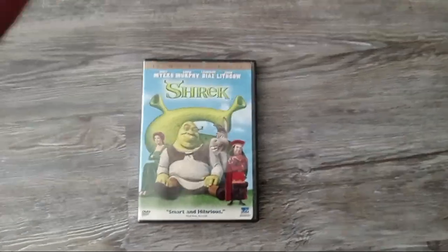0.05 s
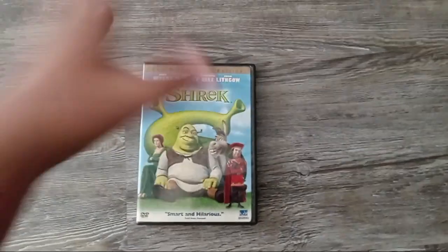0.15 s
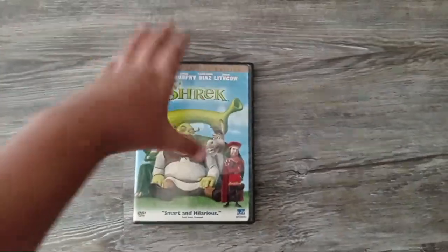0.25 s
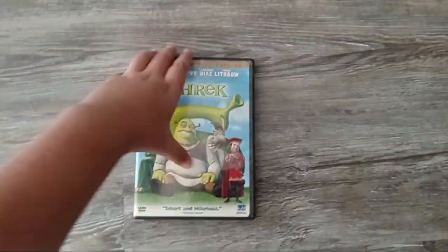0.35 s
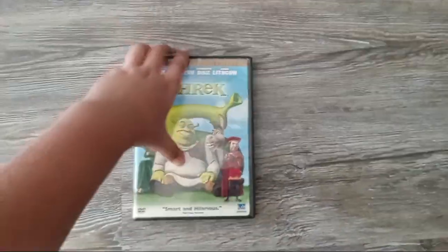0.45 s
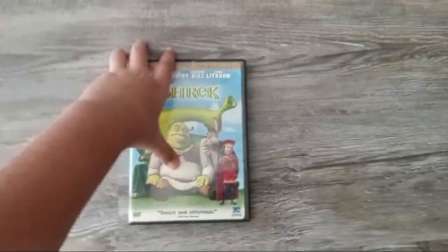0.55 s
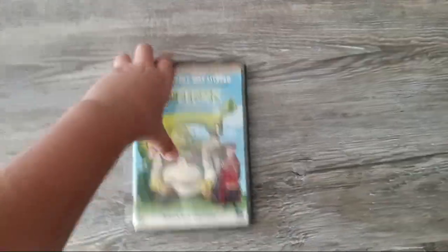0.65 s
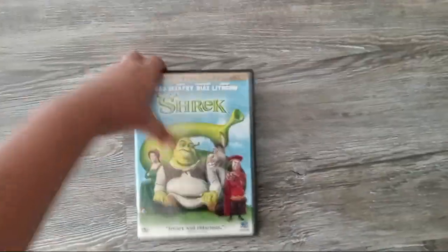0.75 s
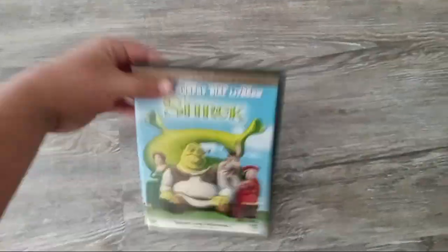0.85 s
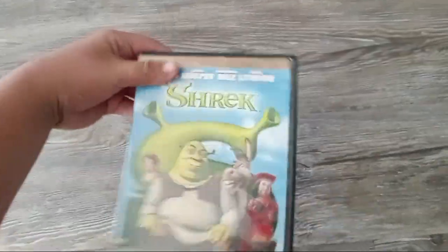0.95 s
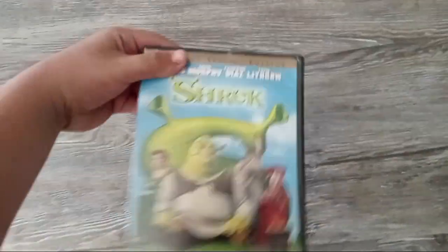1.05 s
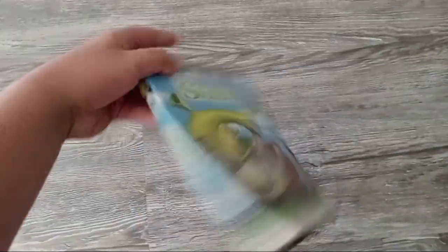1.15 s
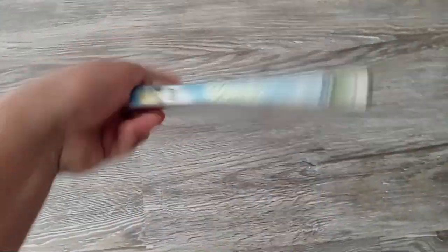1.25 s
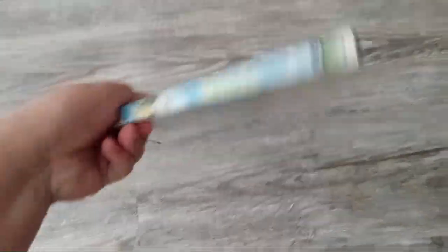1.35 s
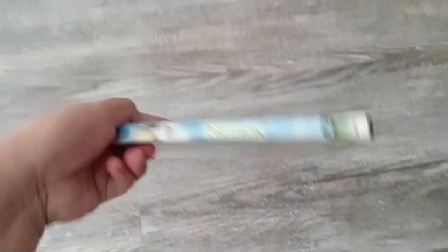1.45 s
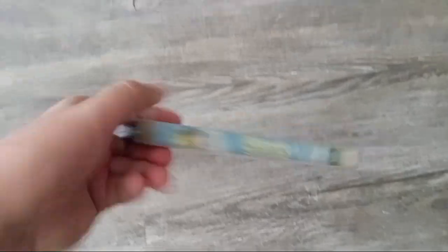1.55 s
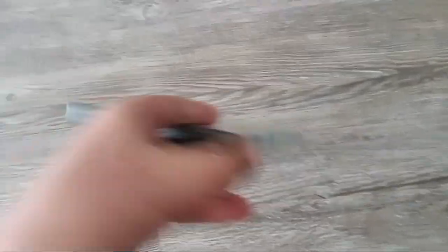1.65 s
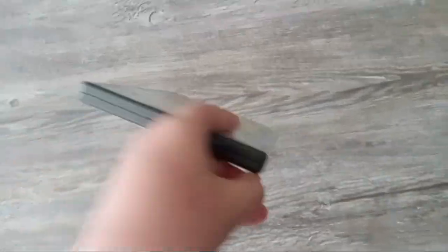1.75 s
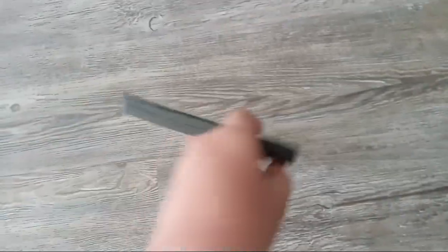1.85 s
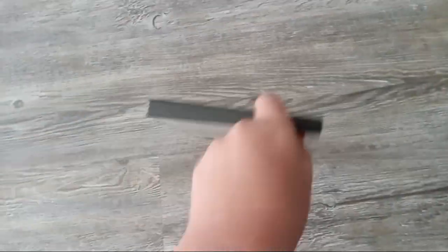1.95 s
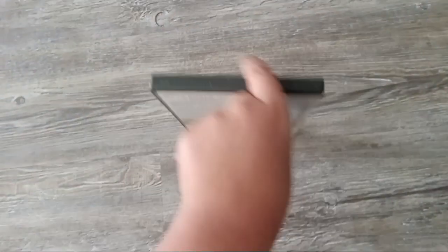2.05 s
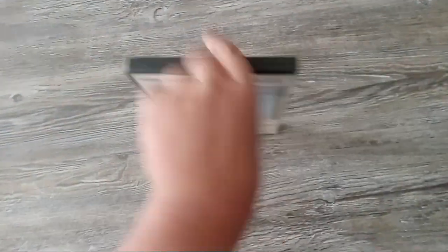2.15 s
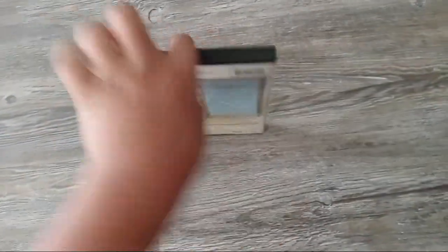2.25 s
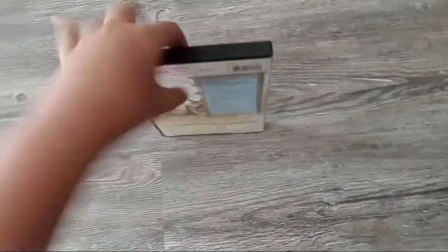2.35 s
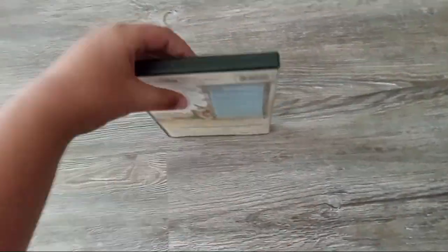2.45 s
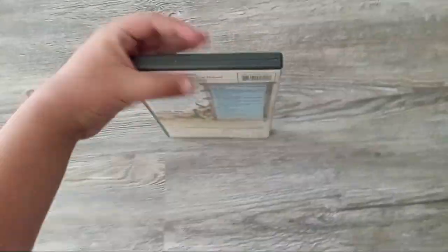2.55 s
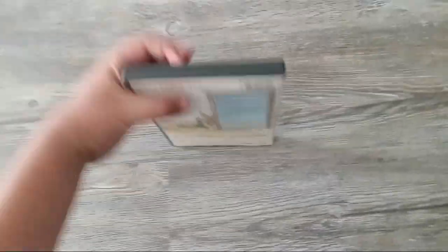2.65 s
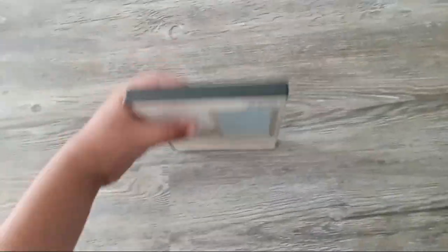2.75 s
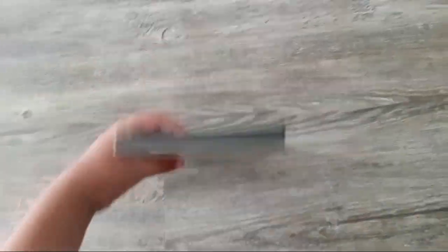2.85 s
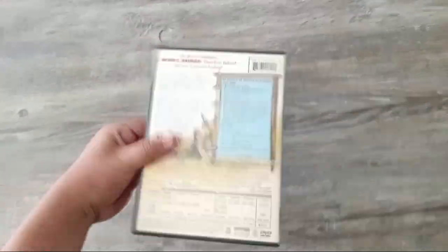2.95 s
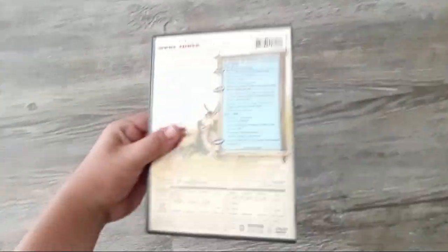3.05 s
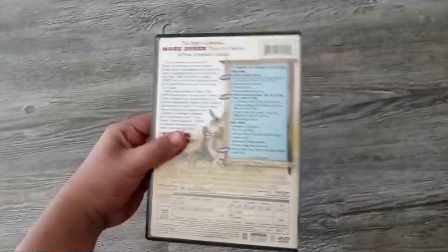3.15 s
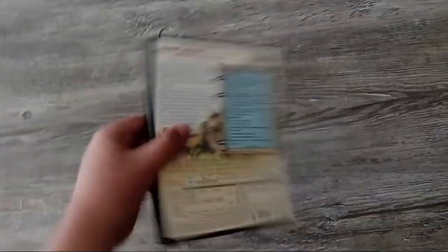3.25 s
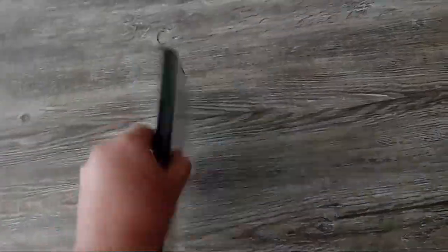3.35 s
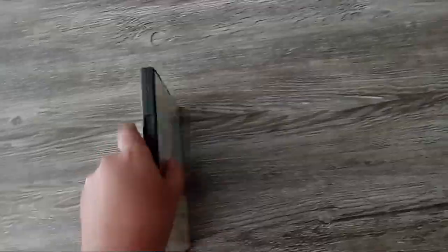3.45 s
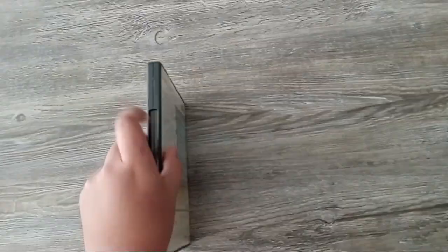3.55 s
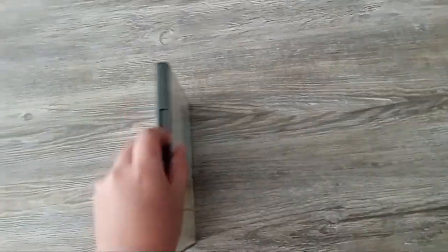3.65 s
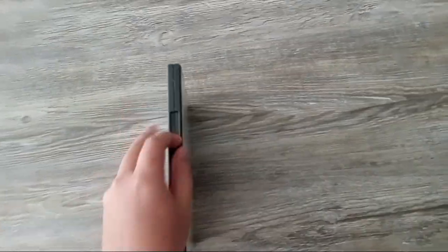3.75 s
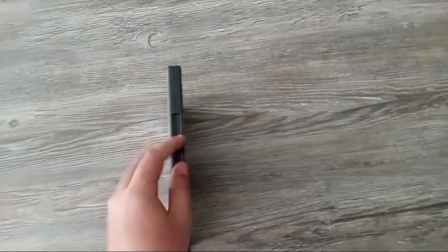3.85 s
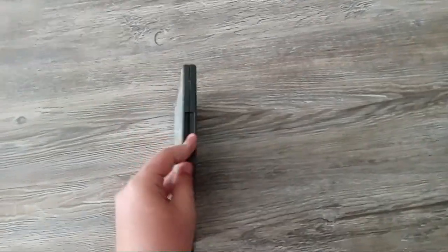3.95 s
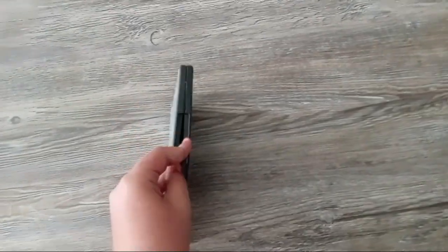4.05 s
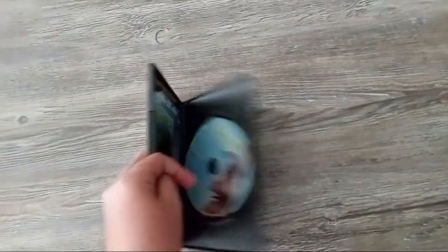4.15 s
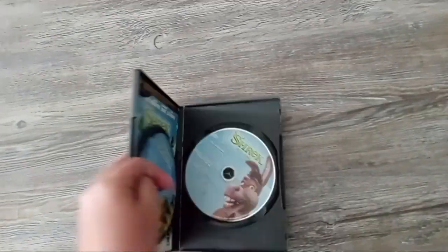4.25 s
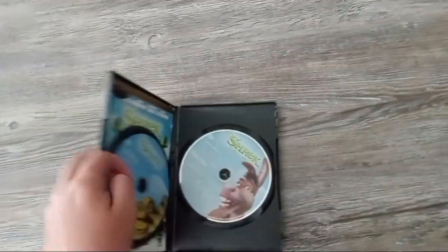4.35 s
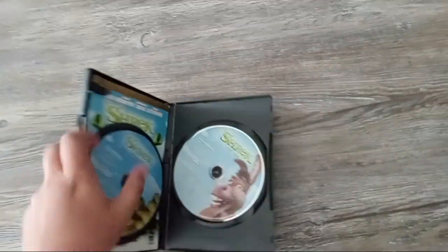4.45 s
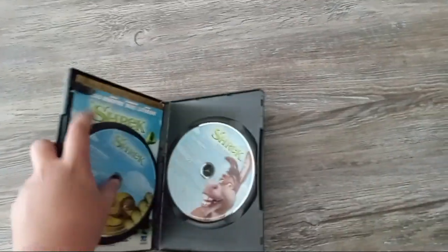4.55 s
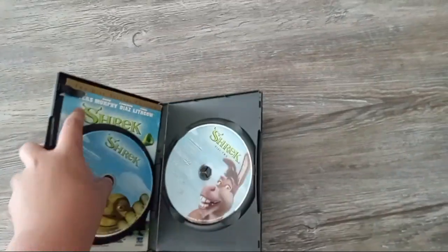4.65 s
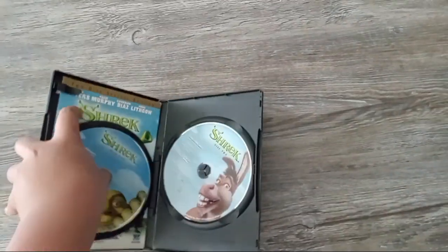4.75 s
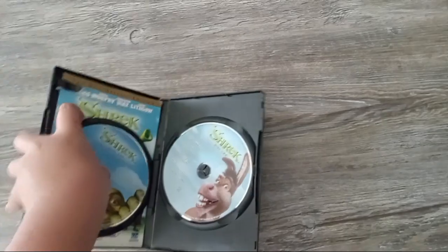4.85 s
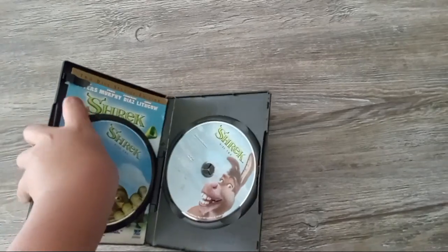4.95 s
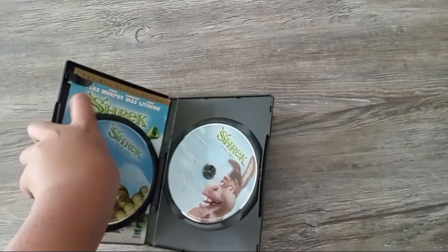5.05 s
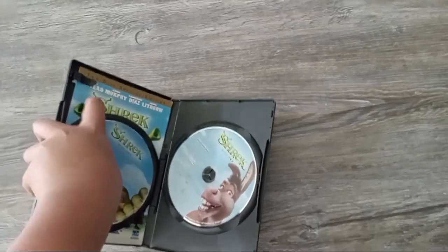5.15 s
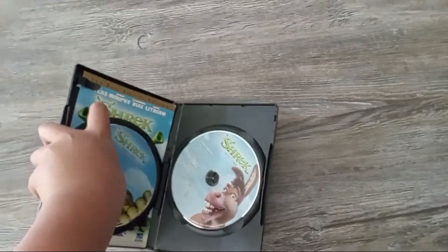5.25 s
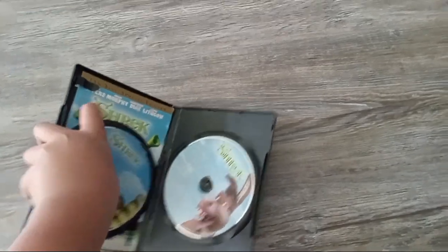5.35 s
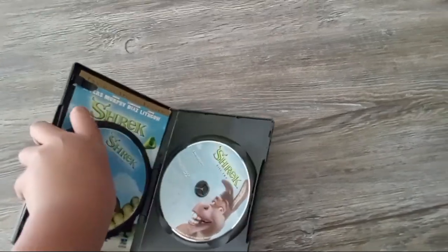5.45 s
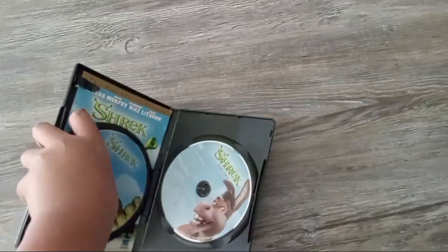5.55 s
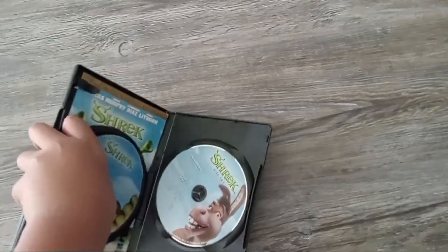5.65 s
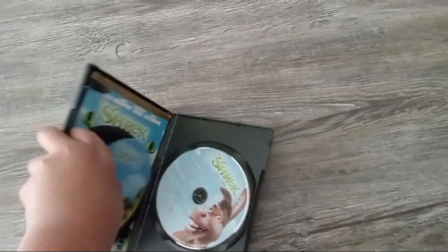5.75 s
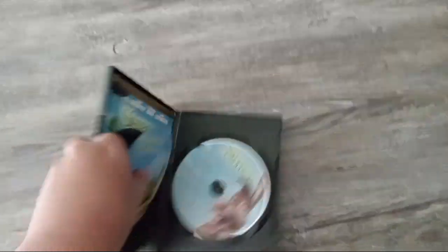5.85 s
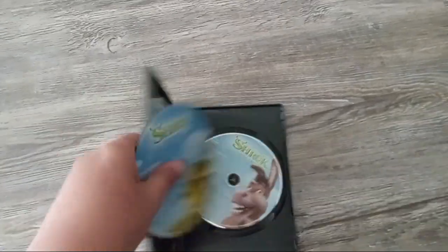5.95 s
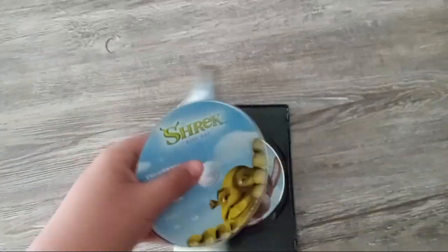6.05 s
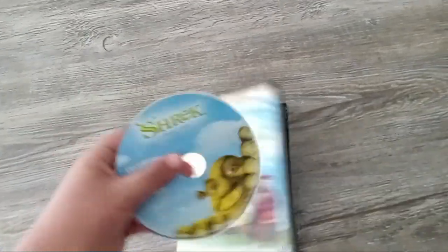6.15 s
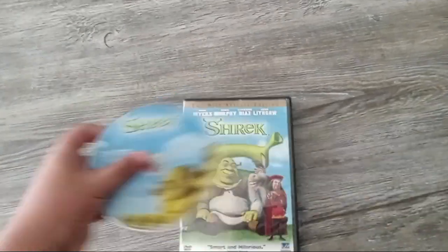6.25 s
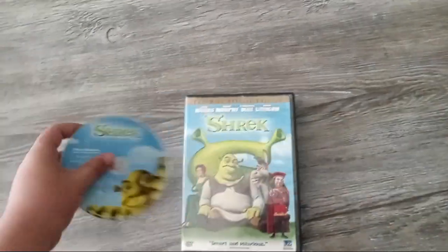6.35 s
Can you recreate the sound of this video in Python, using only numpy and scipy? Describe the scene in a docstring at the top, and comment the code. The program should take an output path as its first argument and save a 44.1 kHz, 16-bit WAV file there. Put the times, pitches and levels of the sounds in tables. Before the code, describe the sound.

Close-up handling of a hollow plastic case in a small, lightly reverberant room: soft skin rubbing, gritty sliding, small ticks and creaks, then thudding landings on a wooden tabletop with bright clacks. The latch pops very loudly and discs clatter. A near-silent gap follows, then a click, rough scraping with gliding squeaks, and the lid shutting in a crisp snap. Faint room hiss and unsteady hum; the image sits left.

```python
"""Disc case on a wooden table

A plastic disc case is slid off the table, turned over, stood on edge and snapped open; a disc is pried
off its hub, scrapes out of the tray, and the lid falls shut. Impacts are noise bursts and decaying modes,
friction is filtered trains of random stick-slip grains, and a small room answers with decaying noise.
A limiter ducks at the loudest snaps and lets the echo swell back."""
import sys
import numpy as np
from scipy import signal
from scipy.fft import rfft, irfft, next_fast_len
from scipy.io import wavfile
from scipy.ndimage import uniform_filter1d, minimum_filter1d, map_coordinates

SR = 44100
rng = np.random.default_rng(int(sys.argv[2]) if len(sys.argv) > 2 else 0)


def wav_out(sig):
    """Save sig, one row per channel (or a flat mono array), as 16-bit PCM at SR to the path in sys.argv[1]."""
    wavfile.write(sys.argv[1], SR, np.round(np.clip(np.atleast_2d(sig).T, -1, 1) * 32767).astype(np.int16))


N = 281799
TIME = np.arange(N) / SR
HIT = np.arange(8192) / SR

# response of the plastic shell: freq_hz, gain_db
SHELL = [(150, -44.5), (250, -32.5), (438, -15), (495, -16), (964, -9.5), (1350, -10.5), (2860, -6.5),
         (4350, -12), (7110, -9.5), (11200, -43), (13300, -47), (15700, -36.5)]
# response of the cover to rubbing and rattling: freq_hz, gain_db
SKIN = [(40, -73), (250, -8), (700, -9.5), (2000, -7), (2750, 1.5), (4300, -9.5), (7100, -9.5),
        (11000, -57), (15500, -64.5)]


def amp(db):
    """Amplitude factor of a level in dB."""
    return 10 ** (np.asarray(db) / 20)


def unit(x):
    """x at rms 1."""
    return x / np.sqrt(np.mean(x ** 2) + 1e-20)


def along(points, hz):
    """Interpolate (freq_hz, value) points on a log frequency axis."""
    f, v = np.transpose(points)
    return np.interp(np.log(hz + 1), np.log(f + 1), v)


def over_time(points):
    """Interpolate (time_s, value) points at every sample."""
    return np.interp(TIME, *np.transpose(points))


def add(track, s, sound):
    """Mix a sound into the track at s seconds."""
    part = track[round(s * SR):][:len(sound)]
    part += sound[:len(part)]


def coloured(x, gain_db):
    """Causal minimum-phase filter whose gain in dB is a function of frequency."""
    n = x.shape[-1]
    m = 2 * next_fast_len(n // 2 + 2048)
    gain = amp(gain_db(np.fft.rfftfreq(m, 1 / SR)))
    # folding the cepstrum onto positive times gives the minimum phase
    cepstrum = irfft(np.log(gain + 1e-6))
    cepstrum[1:m // 2] *= 2
    cepstrum[m // 2 + 1:] = 0
    return irfft(rfft(x, m) * np.exp(rfft(cepstrum)), m)[..., :n]


def shaped(x, spectrum):
    """x through a fixed spectrum, at rms 1."""
    return unit(coloured(x, lambda hz: along(spectrum, hz)))


def core_band(x):
    """The 1.5-4 kHz part, by which releases of the shell are levelled."""
    return coloured(x, lambda hz: -60 * ((hz < 1500) | (hz > 4000)))


def focus(hz, pitch_hz, boost_db=9.0, width=0.1):
    """dB by which a point of contact favours one resonance of the shell."""
    return boost_db * np.exp(-(np.log((hz + 1) / pitch_hz) / width) ** 2)


def wobble(rate_hz):
    """A smooth random curve, rate_hz knots a second."""
    knots = rng.standard_normal(int(N * rate_hz / SR) + 4)
    return map_coordinates(knots, [TIME * rate_hz])


def slips(rate_hz, spread_db):
    """Random tiny stick-slip releases, a few much larger than the rest."""
    spread = np.clip(rng.standard_normal(N), -2, 2)
    sizes = rng.standard_normal(N) * amp(spread_db * spread)
    return sizes * (rng.random(N) < rate_hz / SR)


def diffuse(count):
    """Noise at two close ports: alike in the bass, unrelated in the treble."""
    a, b = rfft(rng.standard_normal((2, count)))
    alike = 1 / (1 + (np.fft.rfftfreq(count, 1 / SR) / 900) ** 2)
    return irfft(np.array([a, alike * a + np.sqrt(1 - alike ** 2) * b]), count)


def shifting(x, depth_db):
    """Narrow bands swell and fade at random; rms 1."""
    z = signal.stft(x, nperseg=1024)[2]
    field = uniform_filter1d(rng.standard_normal(z.shape), size=4, axis=-2)
    field = uniform_filter1d(field, size=5, axis=-1)
    flickering = signal.istft(z * amp(depth_db * unit(field)), nperseg=1024)[1]
    return unit(flickering[..., :N])


def stroke(s, length_s, attack_t60, release_t60, grow_db=0):
    """Gain of one slide: it sets in, drifts by grow_db over its length, and dies away."""
    before = np.maximum(s - TIME, 0) / attack_t60
    after = np.maximum(TIME - s - length_s, 0) / release_t60
    progress = np.clip((TIME - s) / length_s, 0, 1)
    return amp(grow_db * (progress - .5) - 60 * np.minimum(before + after, 3))


def sliding(grains, spectrum, rows, attack_t60, release_t60, grow_db):
    """Grains sound a surface; each slide has its own level and share of fizz above the body."""
    sound = shaped(grains, spectrum)
    lowpass = signal.butter(4, 3900, fs=SR, output="sos")
    body = signal.sosfiltfilt(lowpass, sound)
    fizz = sound - body
    out = np.zeros(N)
    for s, length_s, level_db, fizz_db in rows:
        gain = amp(level_db) * stroke(s, length_s, attack_t60, release_t60, grow_db)
        out += gain * (body + amp(fizz_db) * fizz)
    return out


def click(hollow_db, bright_db, pitch_hz, crack_t60, chatter_db, chatter_t60, top_db):
    """One release of the shell, core peak 1: a crack, gritty chatter, and modes that shift with the grip."""
    # case modes: multiple of the main resonance, t60_s, relative_level_db
    plastic = [(.7, .02, -13), (.88, .025, -4), (1, .03, 0), (1.12, .02, -4), (1.5, .02, -10),
               (2.2, .015, -9)]
    t = HIT
    grit = unit(rng.standard_normal(len(t)) * (rng.random(len(t)) < .06))
    burst = amp(-60 * t / crack_t60) * rng.standard_normal(len(t))
    burst += amp(chatter_db - 60 * t / chatter_t60) * grit
    burst *= 1 - np.exp(-t / 0.00023)
    ripple = rng.standard_normal(SR // 400)

    def shell_db(hz):
        return along(SHELL, hz) + focus(hz, pitch_hz) + 2.8 * map_coordinates(ripple, [hz / 260])

    crack = coloured(burst, shell_db)
    ring = np.zeros(len(t))
    for ratio, t60, db in plastic:
        decay = amp(db - 21 + rng.normal(0, 3) - 60 * t / t60)
        mode_hz = ratio * pitch_hz * rng.normal(1, .03)
        ring += decay * np.sin(2 * np.pi * mode_hz * t) * rng.choice([-1, 1])
    tone = [(900, hollow_db + 6.0), (1700, 0.027), (2900, 0.016),
            (5200, bright_db + 6.0), (9000, bright_db + 3.0), (14000, bright_db + top_db)]
    sound = coloured(crack / abs(crack).max() + ring, lambda hz: along(tone, hz))
    return sound / abs(core_band(sound)).max()


def background(air_db=-56.5):
    """Soft hiss whose narrow bands swell and fade at random, with a faint, unsteady appliance hum."""
    # hiss spectrum: freq_hz, gain_db
    air = [(20, -7), (60, -13), (120, -7), (220, -15.5), (550, -20), (1000, -10.5), (1960, -5.5),
           (2800, -4.5), (4200, -24.5), (7000, -23), (10000, -40), (15500, -83)]
    # hum partials: freq_hz, level_db
    hum = [(1408, -67), (2651, -66.5)]
    out = amp(air_db) * shaped(shifting(diffuse(count=N), depth_db=2.0), air)
    for hz, db in hum:
        out += amp(db + 2 * wobble(4)) * np.sin(2 * np.pi * hz * TIME + wobble(9))
    return out


def rubbing():
    """Skin sticks and slips on the cover in crackly clumps, with a stray tick of the shell now and then."""
    # fingers sliding over the cover: start_s, length_s, rub_db, fizz_db
    strokes = [(0.379, 0.035, -50, 2.5), (1.253, 0.054, -43.5, -1), (1.922, 0.29, -39.5, -12),
               (3.196, 0.13, -42, -8.5), (3.883, 0.081, -48, -5)]
    grains = unit(slips(rate_hz=5000, spread_db=2.5) * amp(2 * wobble(90)))
    strays = unit(slips(rate_hz=70, spread_db=2))
    grains = shifting(grains, depth_db=1.5) + .35 * strays
    return sliding(grains, SKIN, strokes, attack_t60=0.016, release_t60=0.17, grow_db=7.5)


def skidding():
    """The case is pulled toward the table's edge: a gritty scratch with a hollow body and an airy top."""
    # flat case sliding over the wood grain: start_s, length_s, hiss_db, fizz_db
    slides = [(0.577, 0.016, -39, 7), (0.654, 0.035, -36.5, -7.5), (0.752, 0.019, -47.5, 12.5),
              (0.783, 0.017, -37, -17)]
    # response to the wood grain: freq_hz, gain_db
    grain = [(40, -29), (160, -20), (330, -0.5), (660, 1.5), (1150, -14), (1520, -3.5), (2800, 4.5),
             (4400, -13), (7000, -7.5), (11000, -38), (13000, -49), (15500, -36)]
    grains = slips(rate_hz=3000, spread_db=3) * amp(2.5 * wobble(140))
    grains = shifting(grains, depth_db=1.6)
    return sliding(grains, grain, slides, attack_t60=0.024, release_t60=0.43, grow_db=1.5)


def ticks(pitch_hz=2870, attack_s=0.00027, release_t60=0.0075, chatter_db=-24, chatter_t60=0.21,
          ring_db=12, width=0.097):
    """The shell gives way in a brief run of slips, which swells into its narrow resonances."""
    # shell creaking as it flexes under the fingers: start_s, core_rms_db, bright_db, length_s
    creaks = [(0.607, -37, 6, 0.0037), (0.68, -35, -7, 0.0022), (0.788, -31.5, 8, 0.0078),
              (0.967, -44.5, 8.5, 0.0093), (1.062, -26.5, 1, 0.0046), (1.078, -34, 1, 0.008),
              (1.1216, -25, -9, 0.001), (1.27, -28, 1, 0.0088), (1.296, -37, 5, 0.011),
              (1.334, -34.5, 6, 0.001), (1.3645, -29, -12, 0.0051), (1.396, -36.5, 7.5, 0.0033),
              (2.6208, -33.5, 5, 0.0037), (2.676, -31.5, -1, 0.002), (2.857, -19.5, 9, 0.00069),
              (2.875, -25.5, 3.5, 0.0078), (2.9152, -23, -0.5, 0.003), (2.9294, -23, 1.5, 0.0091),
              (3.1954, -36, 3, 0.0073), (3.2577, -30.5, 11.5, 0.0013), (3.279, -32.5, 4, 0.0043),
              (3.3, -29.5, -5.5, 0.021), (4.044, -29.5, 4, 0.0044), (4.054, -31.5, -2, 0.0045),
              (4.5505, -45.5, 12, 0.0028), (5.667, -31, -2, 0.00081), (5.919, -23, 6.5, 0.0013),
              (5.9906, -28, -11, 0.013)]
    out, t = np.zeros(N), HIT
    for s, db, bright_db, length_s in creaks:
        held = amp(-60 * np.maximum(t - length_s, 0) / release_t60)
        chatter = amp(chatter_db - 60 * t / chatter_t60)
        run = (1 - np.exp(-t / attack_s)) * (held + chatter)
        tone = [(900, -12.5), (1900, 4.5), (3700, 6),
                (5000, bright_db + 2.5), (7500, bright_db - 1), (10000, bright_db - 9)]
        grip_hz = pitch_hz * rng.lognormal(sigma=.05)

        def creak_db(hz):
            return along(SHELL, hz) + along(tone, hz) + focus(hz, grip_hz, ring_db, width)

        sound = coloured(run * rng.standard_normal(len(t)), creak_db)
        add(out, s, amp(db) * sound * np.linalg.norm(run) / np.linalg.norm(core_band(sound)))
    return out


def hollows(width=0.13):
    """The air between the lids rings in a narrow band whose pitch depends on how they are held."""
    # hollow after a jolt, a short pop when gripped, a ring when free: start_s, level_db, pitch_hz, t60_s
    rings = [(0.7025, -22, 1610, 0.04), (0.831, -33.5, 910, 0.13), (1.946, -21.5, 1210, 0.03),
             (2.975, -35.5, 880, 0.33), (3.409, -30.5, 940, 0.26), (2.873, -29.5, 419, 0.093),
             (3.989, -29, 1180, 0.045), (4.087, -29.5, 993, 0.47), (4.996, -36, 2100, 0.14),
             (5.439, -22.5, 686, 0.036)]
    out = np.zeros(N)
    t = np.arange(SR // 2) / SR
    for s, db, pitch_hz, t60 in rings:
        def band_db(hz):
            return -22 * np.log10(1 + (np.log((hz + 1) / pitch_hz) / width) ** 2)

        band = unit(coloured(rng.standard_normal(len(t)), band_db))
        add(out, s, amp(db - 60 * t / t60) * band)
    return out


def knocks():
    """Blunt contacts of the shell, most of them with a hollow low end, a few thin and bright."""
    # blunt contacts: start_s, core_peak_db, hollow_db, bright_db, pitch_hz
    contacts = [(0.706, -22, -4, -22, 1700), (0.83, -18, -4, -13, 2280), (1.9463, -35, 6, -24, 2660),
                (2.171, -25, -5, -11.5, 3100), (3.4389, -22.5, 2.5, -12, 2930),
                (3.911, -18.5, -46, -9.5, 1860), (3.993, -19, -4, -24, 2080), (4.094, -4, -9.5, -7, 1840),
                (4.1349, -19.5, -25, -1.5, 3300), (6.2468, -19.5, -5, -31, 2580)]
    out = np.zeros(N)
    for s, db, hollow_db, bright_db, pitch_hz in contacts:
        knock = click(hollow_db, bright_db, pitch_hz, crack_t60=.014, chatter_db=-9.5,
                      chatter_t60=.08, top_db=-10)
        add(out, s, amp(db) * knock)
    return out


def bumps(rattle_db=-38, rattle_t60=0.41, modes_db=-24, modes_t60=0.47):
    """The table top takes a dull push, rattles and booms briefly."""
    # case bumping on the table, soft landings duller: start_s, level_db before dulling, dull_above_hz
    landings = [(0.833, -33.5, 700), (1.27, -41, 490), (1.886, -15.5, 730), (1.947, -21, 660),
                (2.144, -20, 493), (2.541, -36, 567), (2.874, -34.5, 900), (3.408, -17.5, 440),
                (3.4412, -14, 545), (5.439, -30.5, 700), (2.165, -26.5, 500)]
    # table response: freq_hz, gain_db
    table = [(35, -39), (70, -4), (190, 2), (390, -3.5), (500, -8), (900, -1.5), (1200, -63.5)]
    # table top modes: freq_hz, relative_level_db
    board = [(61, -36), (89, -4), (131, 0.5), (195, -1.5), (250, 1.5), (327, -9)]
    out = np.zeros(N)
    t = np.arange(SR // 2) / SR
    for s, db, dull_hz in landings:
        rattle = rng.standard_normal(len(t)) * amp(rattle_db - 60 * t / rattle_t60)
        thud = shaped((t == 0) + rattle, table)
        boom = np.zeros(len(t))
        for hz, level_db in board:
            boom += amp(level_db + rng.normal(0, 1.4)) * np.sin(2 * np.pi * hz * t) * rng.choice([-1, 1])
        bump = thud / abs(thud).max() + amp(modes_db - 60 * t / modes_t60) * boom
        add(out, s, amp(db) * coloured(bump, lambda hz: -10 * np.log10(1 + (hz / dull_hz) ** 4)))
    return out


def dragging(width=0.56):
    """The case judders over the wood and drones in a broad band."""
    # case dragging on the wood: start_s, length_s, drone_db, pitch_hz
    drags = [(1.29, 0.094, -54, 260), (1.929, 0.4, -48.5, 186), (3.485, 0.11, -48.5, 83),
             (5.548, 0.082, -43.5, 268.4)]
    out = np.zeros(N)
    for s, length_s, db, pitch_hz in drags:
        def drone_gain_db(hz):
            return -22 * np.log10(1 + (np.log((hz + 1) / pitch_hz) / width) ** 4 / 2)

        judder = slips(rate_hz=900, spread_db=3)[:SR]
        drone = np.resize(unit(coloured(judder, drone_gain_db)), N)  # one second, looped
        out += amp(db) * drone * stroke(s, length_s, attack_t60=0.19, release_t60=0.22)
    return out


def snaps():
    """Hard, very short releases, the loudest of which drive the limiter."""
    # latch, hub and hard edges letting go:
    # start_s, core_peak_db before the limiter, hollow_db, bright_db, crack_t60_s, pitch_hz
    releases = [(1.8873, 3.5, -6, -9.5, 0.0068, 2750), (2.1446, -11.5, -16.5, -13.5, 0.0057, 3140),
                (2.976, 2.5, -5.5, -10.5, 0.0036, 2746), (3.412, -2, -15.5, -11.5, 0.01, 2910),
                (4.089, 7.5, -20, -8.5, 0.0082, 3170), (4.9956, 5, -36, -16.5, 0.0029, 2445),
                (5.439, -2, -22, -3, 0.0019, 3020), (5.706, -16, -44, -4.5, 0.0035, 3130),
                (6.1762, 1.5, -25, -14, 0.0082, 2480), (6.214, -4.5, -11.5, -10, 0.0032, 2850),
                (6.3844, 9, -36.5, -18, 0.00083, 3540)]
    out = np.zeros(N)
    for s, db, hollow_db, bright_db, t60, pitch_hz in releases:
        snap = click(hollow_db, bright_db, pitch_hz, t60, chatter_db=-16.0, chatter_t60=0.02, top_db=1)
        add(out, s, amp(db) * snap)
    return out


def rattling():
    """After a jolt the loose discs clatter against the shell in bunches and settle."""
    # discs rattling inside: start_s, level_db, t60_s, pitch_hz
    rattles = [(1.895, -39, 1, 3370), (2.162, -41.5, 0.25, 3380), (3.409, -24.5, 0.23, 3560),
               (4.092, -25, 0.52, 3200)]
    chatter = slips(rate_hz=1200, spread_db=3) * amp(3.2 * wobble(110))
    chatter = shaped(shifting(chatter, depth_db=2.2), SKIN)
    out = np.zeros(N)
    for s, db, t60, pitch_hz in rattles:
        clatter = unit(coloured(chatter, lambda hz: focus(hz, pitch_hz)))
        out += amp(db) * stroke(s, 0.011, attack_t60=0.0013, release_t60=t60) * clatter
    return out


def prying():
    """The disc's rim makes a dense rasp in the tray, in a few pulls, with a rough, gliding squeak."""
    # disc scraping out of its tray: start_s, length_s, scrape_db, fizz_db
    scrapes = [(5.507, 0.12, -24, -5), (5.641, 0.046, -27, -9.5), (5.768, 0.03, -25, -9.5),
               (5.809, 0.07, -24, -0.5), (5.91, 0.12, -32.5, -12), (6.047, 0.012, -45.5, 12),
               (6.078, 0.0083, -24, -1), (6.247, 0.062, -31, -12.5)]
    # response to scraping: freq_hz, gain_db
    scrape = [(500, -36.5), (900, -29), (1400, -14), (2000, -3), (2750, -0.5), (3450, 0.5), (4400, -9),
              (5200, -5), (6200, -14), (7050, -4.5), (10000, -34.5), (12800, -49), (15500, -39)]
    # squeak, shifting as the contact travels round the rim: time_s, pitch_hz
    rim = [(5.49, 3100), (5.6, 2280), (5.69, 2320), (5.84, 2950), (5.96, 2800), (6.055, 2260), (6.25, 2650)]
    grains = slips(rate_hz=7000, spread_db=2.5) * amp(2.2 * wobble(160))
    grains = shifting(grains, depth_db=2.2)
    hz, t, z = signal.stft(grains, SR, nperseg=512)
    glide_db = focus(hz[:, None], np.interp(t, *np.transpose(rim)), boost_db=5.5, width=0.17)
    rasp = signal.istft(z * amp(glide_db), nperseg=512)[1][:N]
    squeak_hz = over_time(rim) + 130 * wobble(500)
    phase = 2 * np.pi * np.cumsum(squeak_hz) / SR
    squeak = unit((np.sin(phase) + np.sin(2 * phase) / 2) * amp(3 * wobble(120)))
    return sliding(rasp + .16 * squeak, scrape, scrapes, attack_t60=0.11, release_t60=0.037, grow_db=-1.0)


def bounced(x):
    """A bounce off the table; its delay drifts as the case moves and sweeps notches through the sound."""
    delay_s = np.abs(.0015 + .0005 * wobble(4))
    share = .6
    bounce = map_coordinates(x, [(TIME - delay_s) * SR])
    return (x + share * bounce) / np.hypot(1, share)


def room(x, wet_db=-14, early_db=-15, early_t60=0.096, far_port_db=12):
    """Near reflections and a diffuse tail; the port that faces away hears more of the reflections."""
    # reverberation: freq_hz, t60_s
    decay = [(100, 0.18), (400, 0.43), (1000, 0.68), (2600, 0.4), (6000, 0.35), (12000, 0.28)]
    hz, t, z = signal.stft(diffuse(count=SR // 2), SR, nperseg=256)
    tail = signal.istft(z * amp(-60 * t / along(decay, hz)[:, None]), SR, nperseg=256)[1]
    t = np.arange(tail.shape[1]) / SR
    tail = tail * (1 - np.exp(-t / 0.0088)) / np.linalg.norm(tail[0])
    early = rng.standard_normal(tail.shape) * amp(-60 * t / early_t60) * (t > .002)
    early /= np.linalg.norm(early[0])
    answer = amp(wet_db) * tail + amp([[early_db], [early_db + far_port_db]]) * early
    return signal.fftconvolve(x[None], answer, axes=1)


def echoes(x, count=12):
    """The reflections change gradually, by crossfades, as the case and the hand move about."""
    out, hop = np.zeros((2, N)), N // count
    for centre in range(0, N + 1, hop):
        part = np.arange(max(centre - hop, 0), min(centre + hop, N))
        fade = np.cos(np.pi / 2 * (part - centre) / hop)
        for port, sound in zip(out, room(x[part] * fade)):
            add(port, part[0] / SR, sound)
    return out


def scene():
    """The handling reaches the right port about a millisecond before the left."""
    # lead of the right port as the case is moved about: time_s, lead_ms
    lead = [(0.8, 1.08), (1.9, 0.95), (3.0, 1.06), (5.0, 1.06), (5.5, 0.95)]
    blows = snaps() + ticks() + knocks() + hollows() + bumps() + dragging()
    friction = skidding() + rubbing() + rattling() + prying()
    # each port hears its own drifting bounce
    left, right = blows + bounced(friction), blows + bounced(friction)
    lead_s = over_time(lead) / 1000
    right = map_coordinates(right, [(TIME + lead_s) * SR])
    return np.array([left, right]) + echoes(left) + background()


def record(dry, low_cut_hz=48, ceiling_db=-2, release_db_per_s=300, top_hz=16200):
    """Cut deep bass, make the right port quieter below about 8 kHz and dull the left port above it;
    duck both with one fast limiter, then limit the band."""
    # difference between the ports: freq_hz, left_over_right_db
    ports = [(100, 11.5), (700, 11), (1170, 14.5), (1790, 20), (2740, 32), (4190, 15), (6800, 23),
             (9800, -7)]

    def left_db(hz):
        low_cut = 1 + (low_cut_hz / (hz + 1)) ** 6
        return 5.5 - 10 * np.log10((1 + amp(-along(ports, hz)) ** 2) * low_cut)

    left = coloured(dry[0], left_db)
    right = coloured(dry[1], lambda hz: left_db(hz) - along(ports, hz))
    x = np.array([left, right])
    over_db = np.maximum(20 * np.log10(abs(x).max(axis=0) + 1e-9) - ceiling_db, 0)
    # the gain drops at once and recovers at a steady rate, then is smoothed over 2 ms
    recovery_db = release_db_per_s * TIME
    duck_db = np.maximum.accumulate(over_db + recovery_db) - recovery_db
    x = x * amp(uniform_filter1d(minimum_filter1d(-duck_db, size=89), size=89))
    m = next_fast_len(N + 4096)
    band_limit = 1 + (np.fft.rfftfreq(m, 1 / SR) / top_hz) ** 100
    return irfft(rfft(x, m) / band_limit, m)[:, :N]


dry = scene()
out = record(dry)
wav_out(out)
```